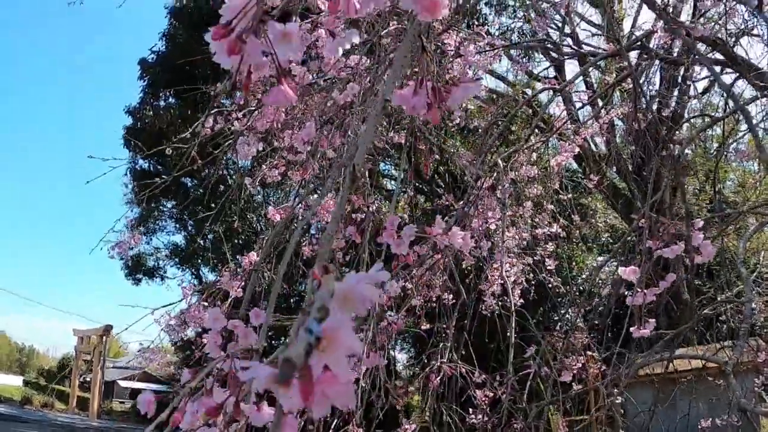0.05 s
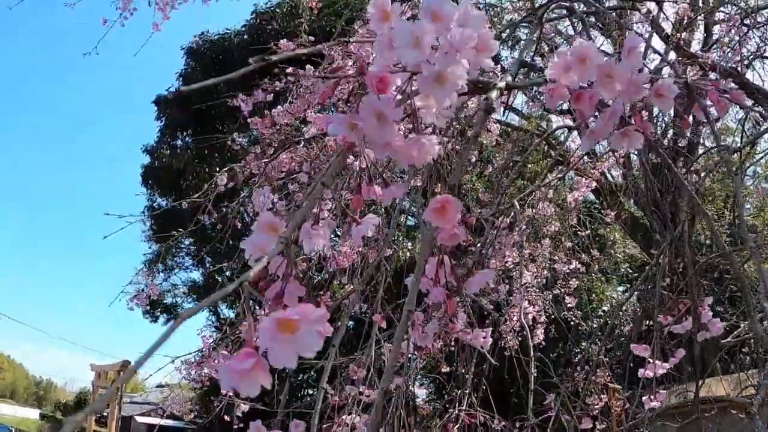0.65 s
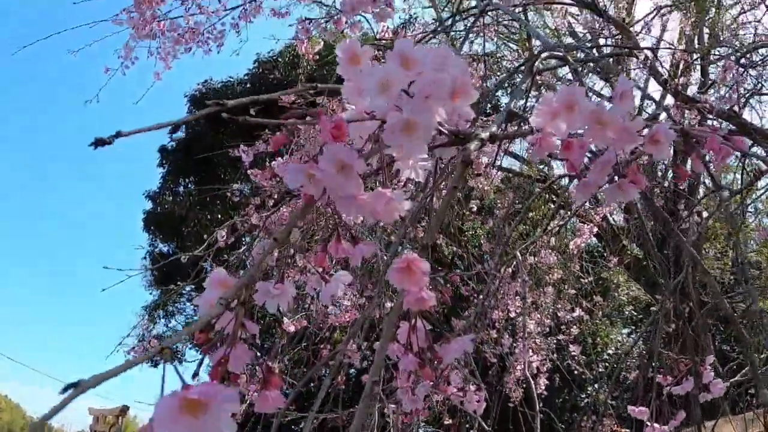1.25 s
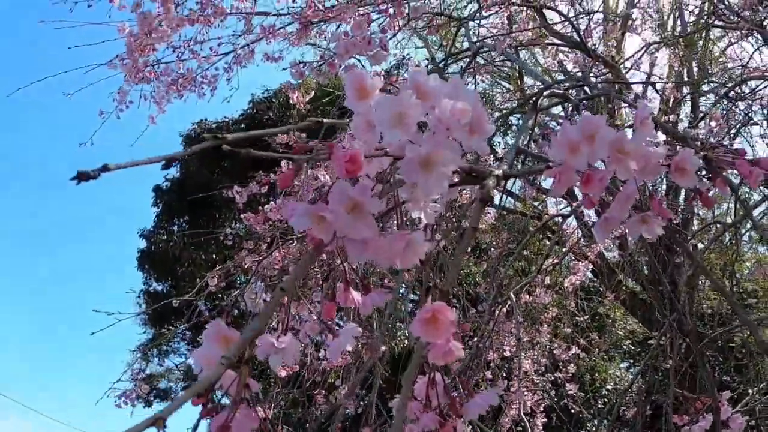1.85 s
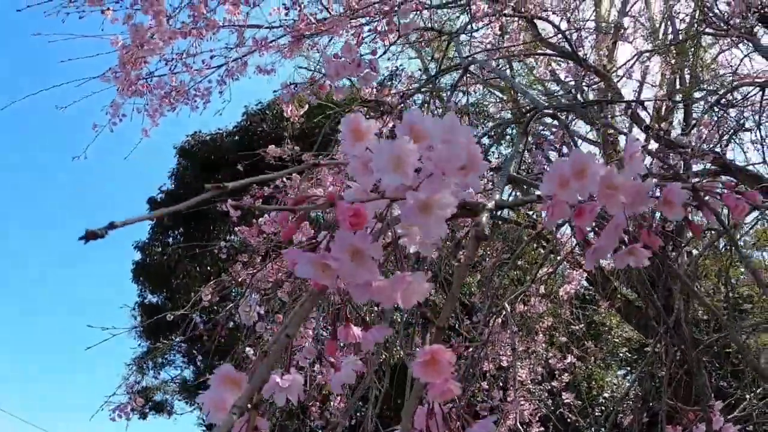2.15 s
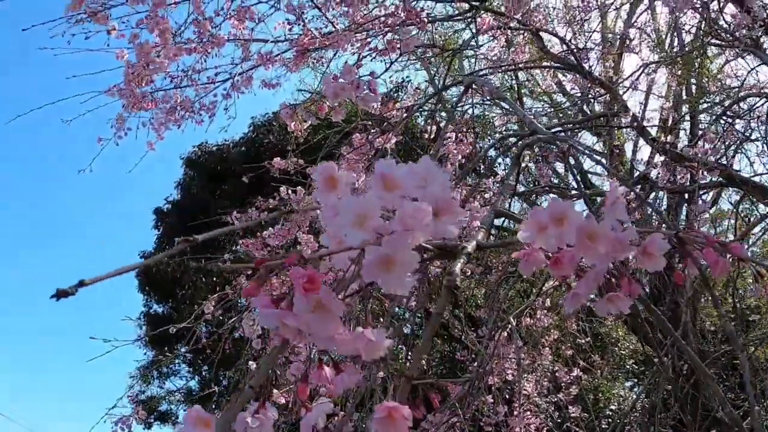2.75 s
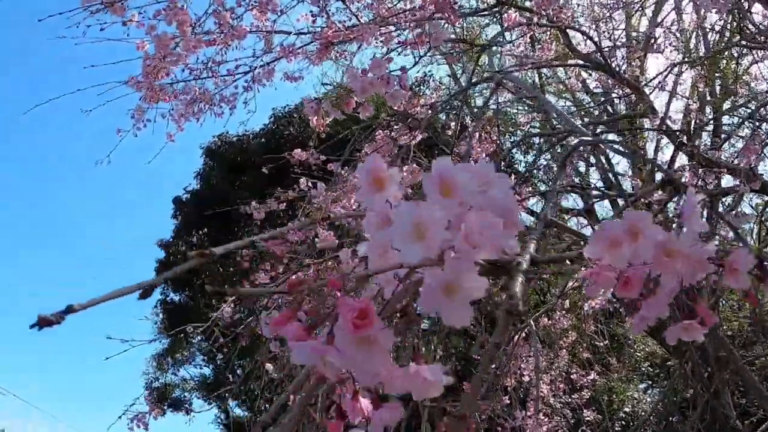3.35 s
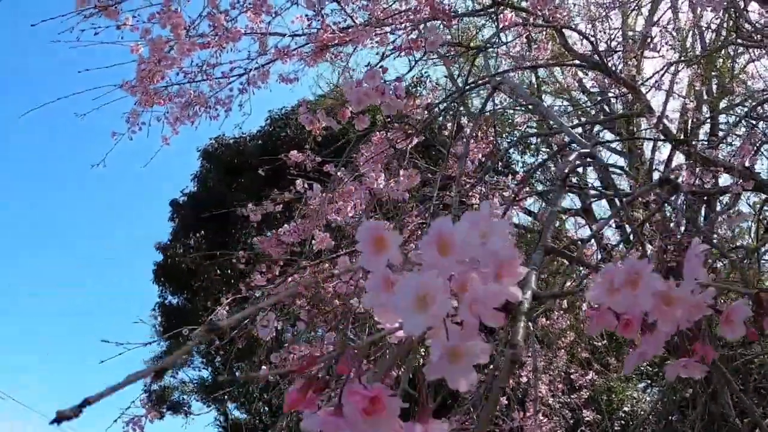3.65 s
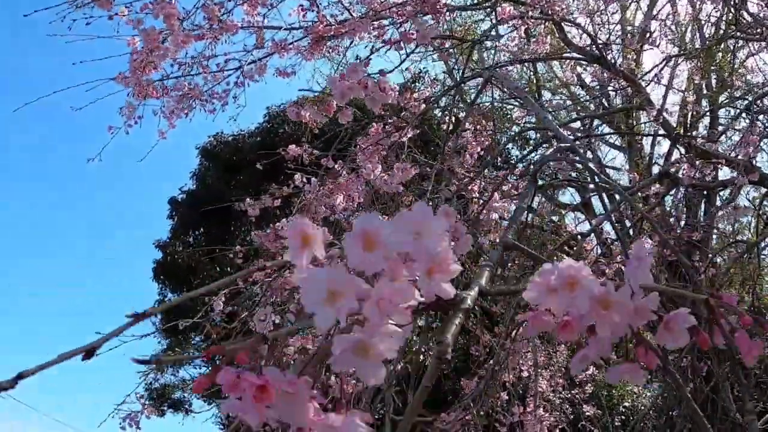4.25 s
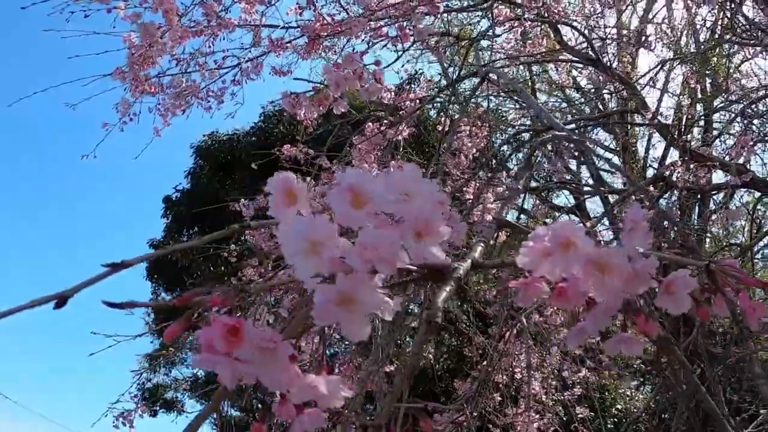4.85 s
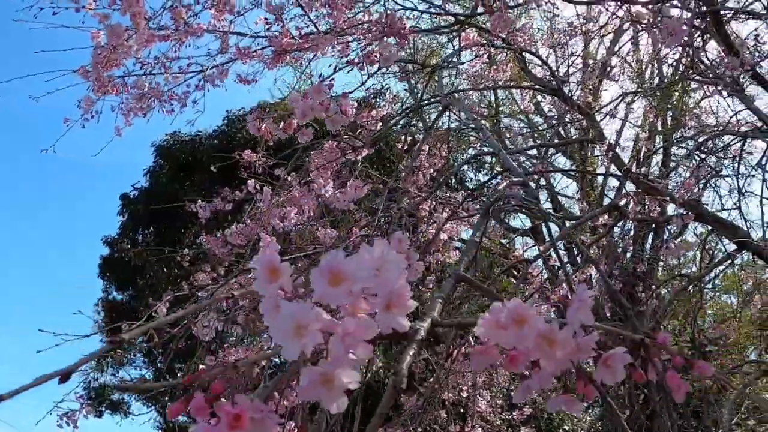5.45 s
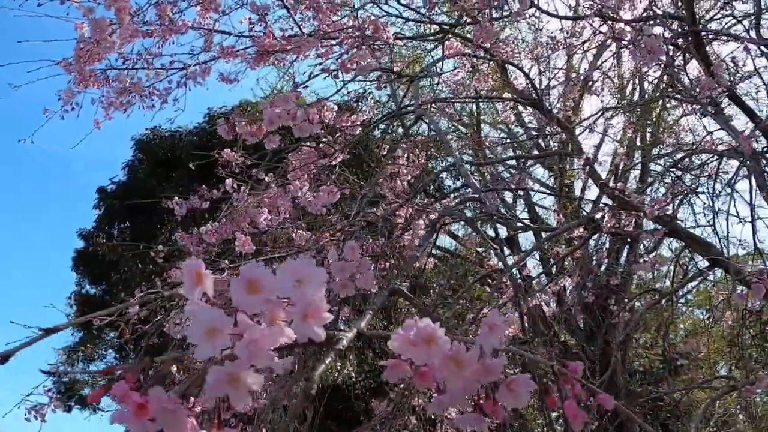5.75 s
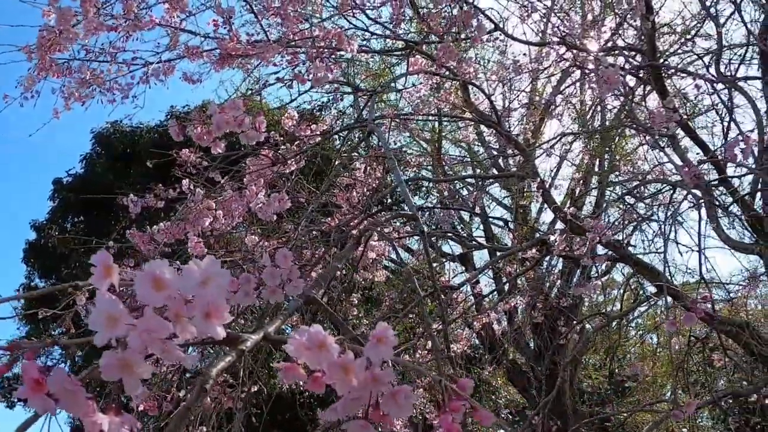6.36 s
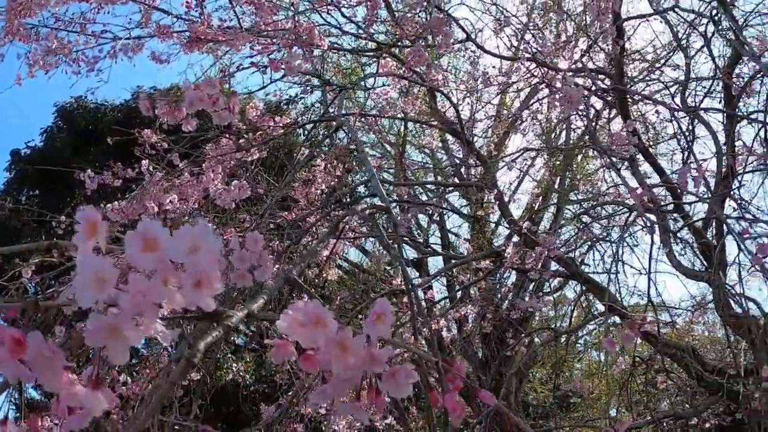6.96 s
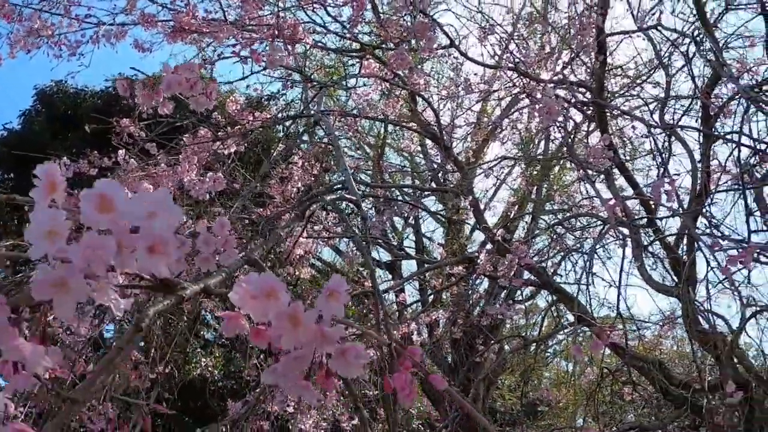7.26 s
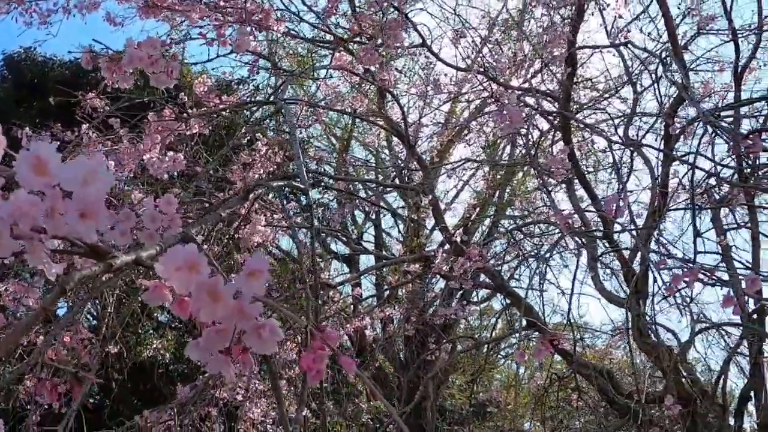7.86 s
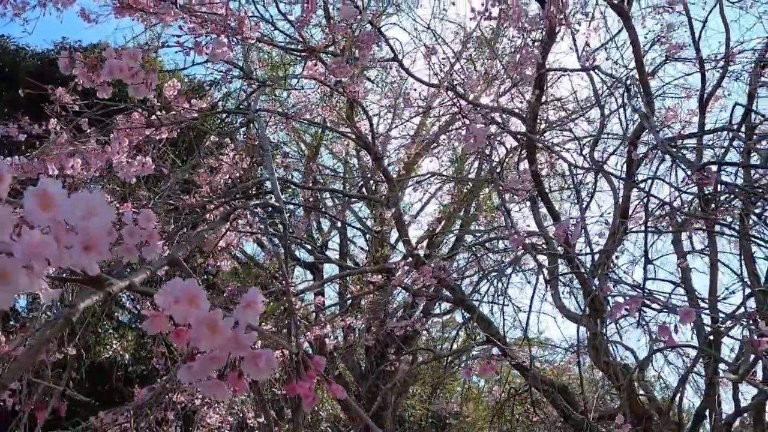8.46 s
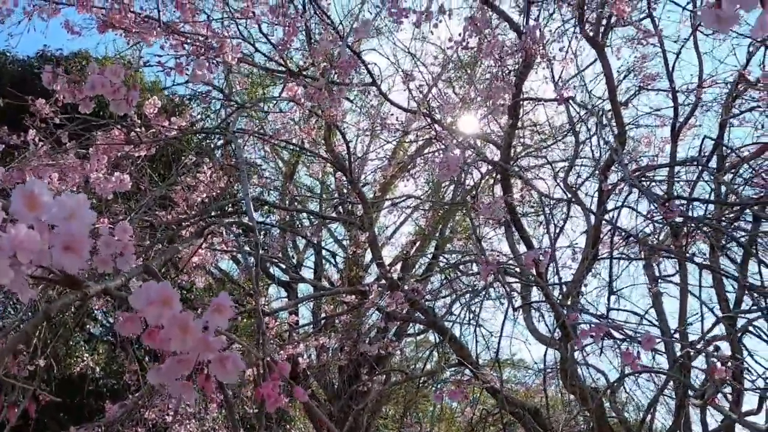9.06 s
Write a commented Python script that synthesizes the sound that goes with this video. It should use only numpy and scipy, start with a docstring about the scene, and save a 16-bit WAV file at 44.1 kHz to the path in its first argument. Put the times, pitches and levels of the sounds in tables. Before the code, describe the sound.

A car's tyre rush recedes, then a small bird sings seven quick, evenly spaced phrases over low wind buffeting and faint chirps.

```python
"""At first a car passes, and its tyre rush recedes down a road, leaving a low drone and far traffic.
A breeze buffets the hand-held microphone throughout, and faint birds call here and there. From 3.5 s
a songbird in a tree sings seven two-part phrases: a double upward whistle, then a buzzy falling note.
A tiny snap follows, then chips and thin calls from the fainter birds. Each note is a tone modulated
in pitch and level, and the trees scatter it into quick echoes and a longer wash."""
import sys
import numpy as np
from scipy import signal
from scipy.fft import rfft, irfft, next_fast_len
from scipy.io import wavfile
from scipy.ndimage import uniform_filter1d, map_coordinates

SR = 44100
rng = np.random.default_rng(int(sys.argv[2]) if len(sys.argv) > 2 else 0)


def store_pcm(level_fs):
    """Save levels as 16-bit WAV."""
    pcm = np.round(np.clip(level_fs, -1, 1) * 32767).astype(np.int16)
    wavfile.write(sys.argv[1], SR, np.atleast_2d(pcm).T)


N = 405719

# Spectra of the noises. Each row: frequency in Hz, relative spectral density in dB.
ROAR_SPECTRUM = [(60, -20), (130, -3), (215, 0), (330, 1), (400, -1), (500, -0.5), (700, -3.5), (860, -2),
                 (960, -2), (1100, -3), (1300, -6), (1800, -22), (2600, -39), (6000, -110)]
HISS_SPECTRUM = [(600, -33.5), (1100, 2.5), (1500, 5), (2000, -0.5), (3000, -8), (4500, -16.5), (6300, -26),
                 (8200, -31.5), (10200, -39.5), (11000, -48.5), (12500, -48.5), (13200, -55), (15000, -57)]
DRONE_SPECTRUM = [(100, -30.5), (160, -6.5), (188, 0), (210, -3), (235, -0.5), (268, -1), (285, 0.5),
                  (310, -3.5), (345, -15), (450, -55), (900, -120)]
TRAFFIC_SPECTRUM = [(100, 0), (300, -8), (450, -20.5), (800, -14), (1020, 3), (1300, 1.5), (1800, -6.5),
                    (2800, -34.5), (4500, -22.5), (6300, -26), (8200, -33), (10000, -48.5), (12000, -65),
                    (15000, -55.5)]
BUFFET_SPECTRUM = [(10, -21.5), (22, 0.5), (34, 2), (48, -1), (70, -2.5), (110, -8.5), (170, -13),
                   (240, -22), (400, -38), (1500, -120)]
SNAP_SPECTRUM = [(1500, -30), (4000, 2), (8000, 1), (10000, -7), (12300, -11), (13200, -40)]
# The drone, and the buffeting between gusts. Each row: time in seconds, relative level in dB.
DRONE_LEVELS = [(0.3, -38.5), (1.69, -37.5), (2.03, -39), (2.92, -39), (3.8, -43), (6.41, -48),
                (7.05, -43.5), (7.78, -52), (8.8, -57)]
LULL_LEVELS = [(0.0, -34.5), (2.15, -37), (2.61, -33.5), (3.66, -39), (4.15, -48), (4.71, -40),
               (5.64, -52.5), (6.61, -44.5), (6.94, -46), (8.02, -40), (8.84, -44), (9.2, -36)]
# Gusts. Each row: time of the peak in seconds, peak level in dB, half width in seconds.
GUSTS = [(.12, -38, 0.22), (0.473, -27, 0.026), (1.325, -31, 0.079), (2.284, -32, .04), (2.553, -33, 0.1),
         (2.772, -27.5, 0.083), (3.545, -32.5, 0.14), (4.58, -36.5, 0.16), (4.818, -36, 0.035),
         (4.987, -32.5, 0.06), (5.957, -37.5, 0.03), (6.7, -41, 0.074), (8.015, -39, 0.06),
         (8.39, -32.5, 0.04), (8.507, -33.5, 0.042), (8.787, -36, 0.057), (9.088, -39, 0.29)]
# Thumps and a tap on the microphone. Each row: time of the peak in seconds, relative level in dB,
# quarter length in seconds, centre frequency in Hz.
THUMPS = [(2.717, -23, 0.018, 69.6), (3.518, -19, 0.016, 147), (3.521, -25.5, 0.015, 234),
          (3.589, -29.5, 0.042, 122.2), (7.998, -24, 0.022, 73), (8.39, -29, 0.01576, 137),
          (8.49, -31.5, 0.023, 62.3), (9.151, -36, 0.00113, 1330)]
# Reverberation of the grove. Each row: frequency in Hz, time to decay by 60 dB in seconds.
GROVE_T60 = [(2000, 0.34), (4000, 0.83), (6000, 0.65), (10000, 0.18)]
# Quick chips, most of them falling. Each row: start and length in seconds, first and last pitch in Hz,
# relative level in dB, levels of the octave and of the scratchy noise in dB against the note.
CHIPS = [(6.392, 0.029, 5400, 4200, -61.5, -40, -10), (7.165, .025, 3750, 3850, -70, -40, -14),
         (7.215, 0.025, 5380, 3550, -65, -38, -9), (7.501, 0.025, 3970, 3450, -56.5, -23, -7),
         (7.524, 0.031, 3430, 2300, -56.5, -16, -8), (7.529, .012, 6050, 5900, -62, -40, -14),
         (7.541, .013, 5400, 3200, -61, -40, -9), (7.564, 0.046, 2850, 2000, -55.5, -25, -8),
         (7.576, .016, 3500, 3300, -59, -40, -12), (7.592, .02, 4950, 4050, -57.5, -40, -13),
         (7.615, .014, 4150, 3600, -57, -40, -9), (7.834, .016, 6000, 5950, -67, -40, -14),
         (7.851, .012, 5070, 3100, -60, -42, -10), (7.868, .03, 2940, 2550, -59, -9, -10),
         (7.888, .018, 3400, 3200, -58, -40, -13), (7.901, 0.029, 2370, 1960, -56.5, -3, -7),
         (7.929, 0.019, 3920, 3100, -61, -42, -3), (8.32, .028, 3880, 4000, -63, -25, -6),
         (8.375, .035, 3900, 3000, -68, -40, -5)]
# Thin sinking calls. Each row: start in seconds, relative level in dB.
THIN_CALLS = [(6.61, -73), (7.35, -71), (8.08, -74.5)]
# Held notes and rasps. Each row: start and length in seconds, first and last pitch in Hz,
# relative level in dB, pitch jitter in Hz, scattered sound in dB against the direct.
HELD_NOTES = [(1.6, .24, 4370, 4520, -67.5, 70, -2), (1.88, .14, 4430, 4170, -61.5, 50, -3),
              (5.6, 0.25, 4400, 4200, -60, 90, -5.5), (8.49, .05, 7800, 7600, -72, 400, -5.5),
              (8.67, 1, 4150, 4170, -65, 368, -5), (9.08, .07, 6000, 6230, -70, 130, -4),
              (9.174, .077, 5060, 5200, -53, 400, -5.5)]
# Contours of three notes. Each row: time within the note in seconds, pitch in Hz, relative level in dB.
ARCH_CONTOUR = [(0, 3600, -10), (.026, 3830, 2), (.036, 3900, -13), (.046, 4130, -2), (.066, 3950, -2),
                (.082, 3800, 0), (.102, 3550, -9)]
WHISTLE_CONTOUR = [(-.003, 3280, -21), (.005, 3458, -12), (.018, 3693, -7), (.031, 3960, -2.5),
                   (.04, 4532, -11), (.044, 3696, -9), (.051, 3460, -5.5), (.072, 3900, -7.5),
                   (.086, 4400, -14.5)]
BUZZ_CONTOUR = [(0, 6260, -23), (.008, 6140, -13.5), (0.027, 5660, -4), (.05, 5300, -4.5), (.078, 5270, -8),
                (.094, 5077, -5), (.103, 4860, -26)]
# The song's phrases. Each row: start in seconds, whistle gain in dB, its pitch shift in Hz, further
# shift of its second sweep in Hz, pip level in dB, buzz gain in dB, buzz pitch shift in Hz.
PHRASES = [(3.504, -39.5, -50, -20, -65, -38.5, 16), (3.889, -34, -1, 71, -52, -38, 0),
           (4.273, -34.5, -13, 21, -48, -40, -10), (4.654, -35, 15, 91, -52.5, -40, 39),
           (5.040, -35, 36, 58, -48.5, -42, 69), (5.427, -35, 16, 9, -50, -45, 89.5),
           (5.817, -36, 0, -12, -53, -45.5, 52)]

NEAREST_S, ROAD_M, SPEED_M_PER_S = 0.66, 32.2, 11.55  # when the car is nearest, how near, how fast


def amp(db):
    """Decibels converted to an amplitude ratio."""
    return 10 ** (np.asarray(db) / 20)


def unit(x):
    """Normalisation to an rms of 1."""
    return x / np.sqrt(np.mean(x ** 2) + 1e-20)


def along(points, hz):
    """Interpolation of (Hz, value) points on a logarithmic frequency axis."""
    frequencies, values = np.transpose(points)
    return np.interp(np.log(hz + 1), np.log(frequencies), values)


def curve(points):
    """Linear interpolation of (seconds, value) points at every sample."""
    return np.interp(np.arange(N) / SR, *np.transpose(points))


def wobble(rate, size=N):
    """Random modulation: a smooth curve through rate random knots a second."""
    knots = rng.standard_normal(int(size * rate / SR) + 4)
    return map_coordinates(knots, [np.arange(size) * rate / SR])


def swell(s, half_width_s):
    """A Gaussian envelope: 1 at time s, 1/e a half width to either side."""
    return np.exp(-((np.arange(N) / SR - s) / half_width_s) ** 2)


def filtered(x, response):
    """Linear filtering: the spectrum of x is multiplied by a frequency response."""
    size = next_fast_len(N + SR // 2)
    return irfft(rfft(x, size) * response(np.fft.rfftfreq(size, 1 / SR)), size)[:N]


def add(track, s, sound):
    """Superposition of a sound on the track from time s."""
    room = track[max(round(s * SR), 0):][:len(sound)]
    room += sound[:len(room)]


def rush(spectrum, patchy_db):
    """Coloured noise of rms 1, amplitude-modulated in random patches of time and frequency."""
    bins = signal.stft(rng.standard_normal(N), nperseg=1024)[2]
    patches = uniform_filter1d(rng.standard_normal(bins.shape), size=6, axis=0)
    patches = uniform_filter1d(patches, size=9, axis=1)
    noise = signal.istft(bins * amp(patchy_db * unit(patches)), nperseg=1024)[1][:N]
    return unit(filtered(noise, lambda hz: amp(along(spectrum, hz))))


def receding(nearest_db, loss_db_per_m):
    """Gain of a car's sound under spherical spreading and absorption by ground and hedges."""
    distance = np.hypot(ROAD_M, SPEED_M_PER_S * (np.arange(N) / SR - NEAREST_S))
    absorbed_db = loss_db_per_m * (distance - ROAD_M)
    return ROAD_M / distance * amp(nearest_db - absorbed_db + 0.27 * wobble(3.7))


def tread_whine(centre_hz=951, half_width_hz=41):
    """Narrow-band noise: the tyre tread sings unsteadily while the car is close."""
    skirt = [(-8, -120), (-1, -8), (0, 0), (1, -8), (8, -120)]  # half widths off centre, dB
    band = rush([(centre_hz + widths * half_width_hz, db) for widths, db in skirt], patchy_db=4)
    return amp(-42.5) * swell(NEAREST_S, half_width_s=0.99) * band


def road():
    """Attenuation with distance: tyre roar and hiss fade over a low drone and steady far traffic."""
    roar = receding(nearest_db=-31.5, loss_db_per_m=0.3) * rush(ROAR_SPECTRUM, patchy_db=0.9)
    hiss = receding(nearest_db=-42.5, loss_db_per_m=0.14) * rush(HISS_SPECTRUM, patchy_db=0.84)
    drone = amp(curve(DRONE_LEVELS) + 1) * rush(DRONE_SPECTRUM, patchy_db=2.0)
    whine = tread_whine()
    traffic = amp(-56.5) * rush(TRAFFIC_SPECTRUM, patchy_db=1)
    return roar + hiss + whine + drone + traffic


def breeze(eddy_db=1.2):
    """Turbulence: eddies rumble on the microphone and gusts add in power, amid soft thumps and a tap."""
    lull_power = amp(curve(LULL_LEVELS) + 1) ** 2
    gust_power = sum((amp(db) * swell(s, half_width_s)) ** 2 for s, db, half_width_s in GUSTS)
    eddies = amp(eddy_db * wobble(18))
    rumble = np.sqrt(lull_power + gust_power) * eddies * rush(BUFFET_SPECTRUM, patchy_db=0.5)
    for s, db, quarter_s, hz in THUMPS:
        t = np.arange(-2 * quarter_s, 2 * quarter_s, 1 / SR)
        uneven_hz = hz * (1 + 0.13 * wobble(136, len(t)))
        push = np.sin(2 * np.pi * np.cumsum(uneven_hz) / SR)
        add(rumble, s - 2 * quarter_s, amp(db - 2.5) * push * np.hanning(len(t)))
    return rumble


def snap(start_s=6.4695, click_t60=0.004, crackle_t60=0.13):
    """A tiny transient, perhaps a twig: a click and a soft crackle, both decaying exponentially."""
    t = np.arange(SR // 5) / SR
    envelope = amp(-55 - 60 * t / click_t60) + amp(-70 - 60 * t / crackle_t60)
    track = np.zeros(N)
    add(track, start_s, envelope * rng.standard_normal(len(t)))
    return filtered(track, lambda hz: amp(along(SNAP_SPECTRUM, hz)))


def among_trees(note, near_db, far_db, near_t60):
    """Multipath scattering: a note, its quick echoes off near branches and the grove's longer wash."""
    hz, t, bins = signal.stft(rng.standard_normal(SR * 3 // 4), SR, nperseg=256)
    decay = amp(-60 * t / along(GROVE_T60, hz)[:, None])
    wash = signal.istft(bins * decay, SR, nperseg=256)[1]
    delays_s = rng.uniform(0.0036, 0.052, size=40)
    echoes = rng.standard_normal(len(delays_s)) * amp(-60 * delays_s / near_t60)
    branches = np.bincount((delays_s * SR).astype(int), echoes, len(wash))
    paths = amp(far_db) * wash / np.linalg.norm(wash)
    paths += amp(near_db) * branches / np.linalg.norm(branches)
    paths[0] += 1  # the direct path
    return signal.fftconvolve(note, paths)


def syrinx(hz, db):
    """Sinusoidal oscillation: a bird's pure tone follows a pitch and an rms level, with soft ends."""
    soft_ends = signal.windows.tukey(len(hz), 0.06)
    return np.sqrt(2) * amp(db) * soft_ends * np.sin(2 * np.pi * np.cumsum(hz) / SR)


def gesture(contour):
    """Jitter and shimmer: a note's pitch and level stray a little from their contour each time."""
    s, hz, db = np.transpose(contour)
    t = np.arange(s[0], s[-1], 1 / SR)
    pitch = np.interp(t, s, hz) * (1 + 0.0055 * wobble(40.4, len(t)))
    level_db = np.interp(t, s, db) + 1.6 * wobble(95.5, len(t))
    return pitch, level_db


def far_call(length_s, pitches, db, rasp_hz, wet_db, octave_db=-60):
    """A gliding note: random frequency modulation makes it hoarse and scattering blurs it."""
    progress = np.linspace(0, 1, int(length_s * SR))
    glide = np.interp(progress, np.linspace(0, 1, len(pitches)), pitches)
    hz = glide + rasp_hz * wobble(800, len(progress))
    envelope = np.sqrt(np.abs(np.sin(np.pi * progress)))
    note = (syrinx(hz, db - 4.0) + syrinx(2 * hz, db + octave_db)) * envelope
    return among_trees(note, near_db=wet_db, far_db=wet_db, near_t60=0.19)


def chip(length_s, first_hz, last_hz, db, octave_db, scratch_db):
    """A quick squeak with its octave; wide frequency modulation spreads a copy into scratchy noise."""
    pitches = [first_hz, last_hz]
    squeak = far_call(length_s, pitches, db, rasp_hz=115, wet_db=-4.5, octave_db=octave_db)
    scratch = far_call(length_s, pitches, db + scratch_db, rasp_hz=1090, wet_db=1.5)
    return squeak + scratch


def arched_call(db, rasp_hz=40, rasp_hz_per_s=1500, octave_db=-23):
    """A call steps up to its crest, and growing frequency jitter turns it hoarse as it sinks."""
    hz, contour_db = gesture(ARCH_CONTOUR)
    t = np.arange(len(hz)) / SR
    hz += (rasp_hz + rasp_hz_per_s * t) * wobble(603, len(hz))
    note = syrinx(hz, db + contour_db) + syrinx(2 * hz, db + octave_db)
    return among_trees(note, near_db=-7, far_db=-6, near_t60=0.3)


def other_birds():
    """Superposition of faint voices: chips, an arched call, thin sinking calls and held notes."""
    calls = np.zeros(N)
    for s, *shape in CHIPS:
        add(calls, s, chip(*shape))
    add(calls, 0.325, arched_call(db=-49))
    for s, db in THIN_CALLS:
        add(calls, s, far_call(0.29, [6050, 5850, 5650], db, rasp_hz=320, wet_db=-3.5))
    for s, length_s, first_hz, last_hz, db, rasp_hz, wet_db in HELD_NOTES:
        add(calls, s, far_call(length_s, [first_hz, last_hz], db, rasp_hz, wet_db))
    return calls


def whistle(db, pip_db, wet_db, shift_hz, second_shift_hz, lead_s):
    """Frequency sweeps: a soft pip leads two quick rises, the second pitched anew in each phrase."""
    pip_hz, pip_size, second_sweep_s = 3800, int(0.035 * SR), 0.0427
    hz, contour_db = gesture(WHISTLE_CONTOUR)
    t = WHISTLE_CONTOUR[0][0] + np.arange(len(hz)) / SR
    pitch = hz + shift_hz + second_shift_hz * (t > second_sweep_s) + 18 * wobble(489, len(hz))
    note = np.zeros(int(lead_s * SR) + len(hz))
    pip = syrinx(pip_hz + 50 * wobble(300, pip_size), pip_db) * np.hanning(pip_size)
    add(note, 0, pip)
    add(note, lead_s + t[0], syrinx(pitch, db + contour_db))
    return among_trees(note, near_db=wet_db - 10.0, far_db=wet_db - 8.5, near_t60=0.29)


def buzz(db, wet_db, shift_hz, rasp_hz):
    """Fast frequency and amplitude modulation makes a falling note buzz; twigs scatter its octave."""
    flutter_hz, swing_hz, swing_db = 210, 240, 0.5
    hz, contour_db = gesture(BUZZ_CONTOUR)
    uneven_hz = flutter_hz * (1 + 0.05 * wobble(91, len(hz)))
    flutter = np.sin(2 * np.pi * np.cumsum(uneven_hz) / SR)
    pitch = hz + shift_hz + swing_hz * flutter + rasp_hz * wobble(696, len(hz))
    level_db = db + contour_db + swing_db * flutter
    octave_db = np.linspace(-41, -65, len(hz))  # the attack is the brightest moment
    note = among_trees(syrinx(pitch, level_db), near_db=wet_db - 12, far_db=wet_db - 8, near_t60=0.21)
    octave = among_trees(syrinx(2 * pitch, level_db + octave_db), near_db=-3, far_db=0, near_t60=0.21)
    return note + octave


def songbird(pip_lead_s=0.03, buzz_after_s=0.17):
    """Whistle and buzz alternate; the scattered-to-direct ratio and the rasp grow with each phrase."""
    song = np.zeros(N)
    for k, phrase in enumerate(PHRASES):
        s, whistle_db, shift_hz, second_shift_hz, pip_db, buzz_db, buzz_shift_hz = phrase
        whistle_wet_db, buzz_wet_db = -1.5 + 0.45 * k, 1.3 + 1.31 * k
        sweeps = whistle(whistle_db, pip_db, whistle_wet_db, shift_hz, second_shift_hz, pip_lead_s)
        add(song, s - pip_lead_s, sweeps)
        add(song, s + buzz_after_s, buzz(buzz_db, buzz_wet_db, buzz_shift_hz, rasp_hz=20 + 18 * k))
    return song


def scene():
    """Superposition of birds, road, breeze and snap at one microphone."""
    return (songbird() + other_birds() + road() + breeze() + snap())[None]


def record(dry):
    """Band limiting: an ideal low-pass filter removes the highest treble."""
    cutoff_hz = 15050
    return np.array([filtered(channel, lambda hz: hz < cutoff_hz) for channel in dry])


dry = scene()
out = record(dry)
store_pcm(out)
```